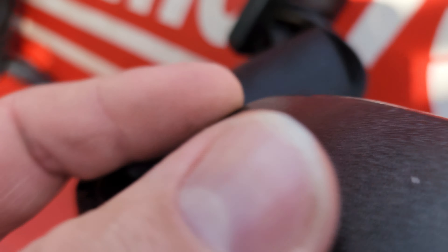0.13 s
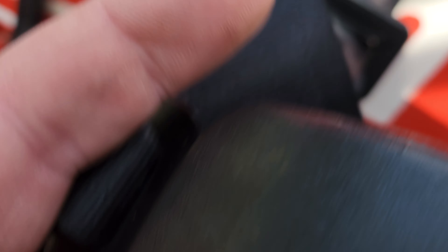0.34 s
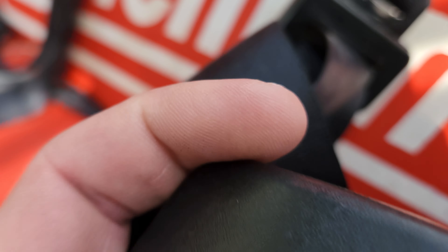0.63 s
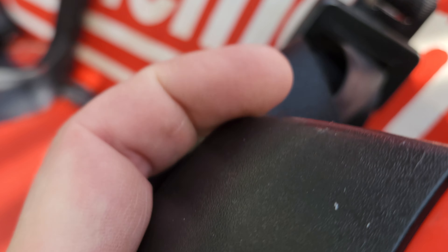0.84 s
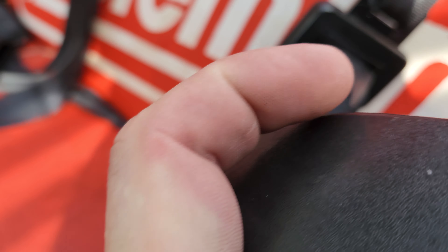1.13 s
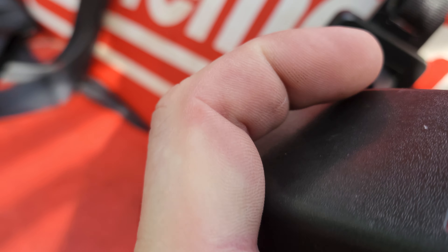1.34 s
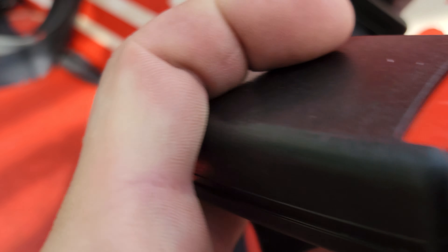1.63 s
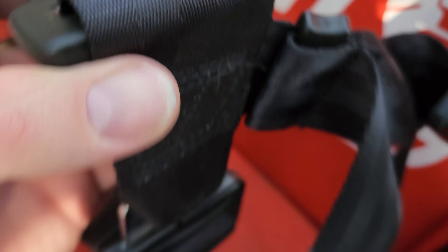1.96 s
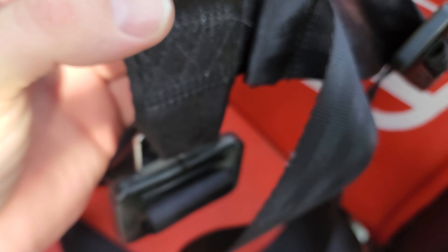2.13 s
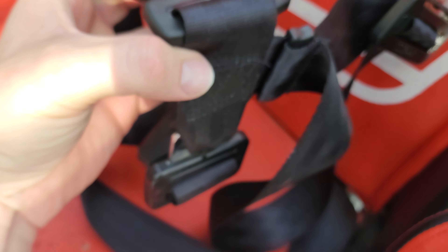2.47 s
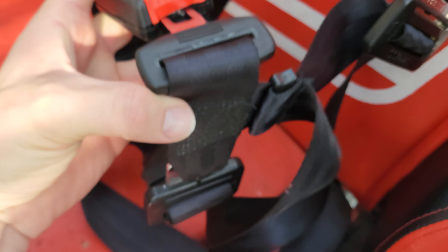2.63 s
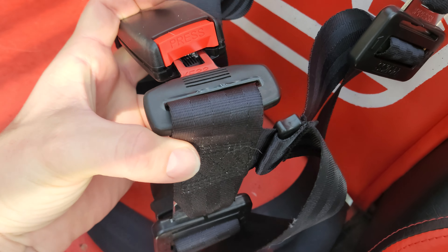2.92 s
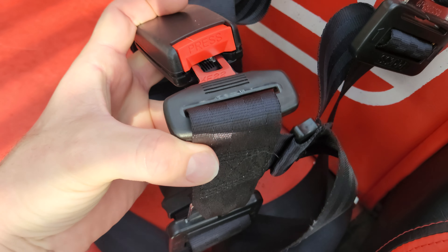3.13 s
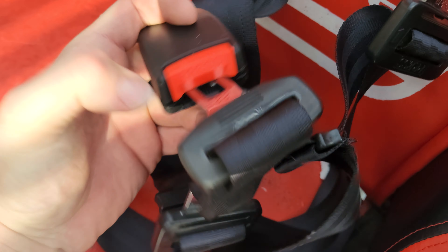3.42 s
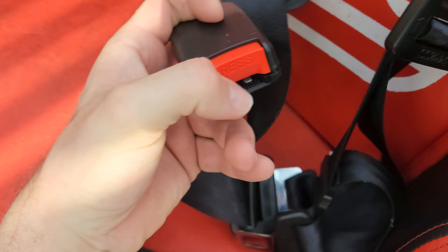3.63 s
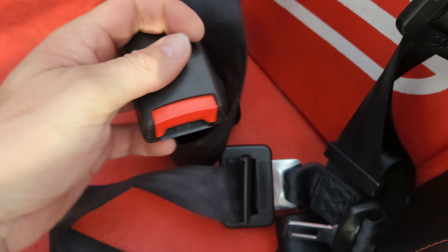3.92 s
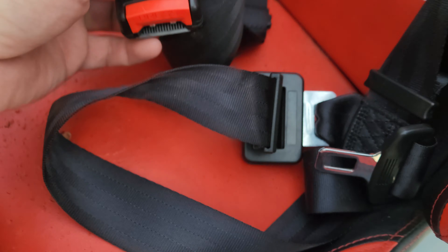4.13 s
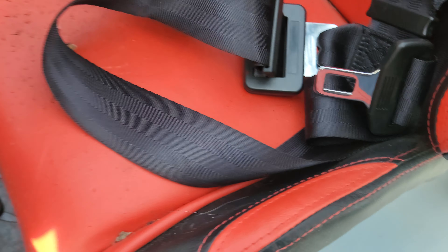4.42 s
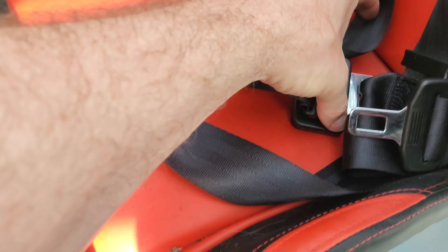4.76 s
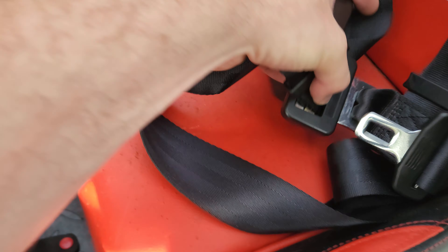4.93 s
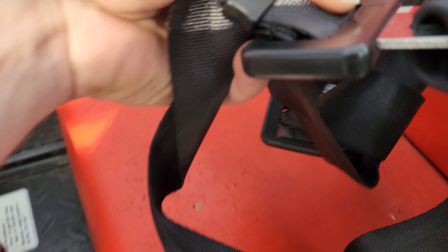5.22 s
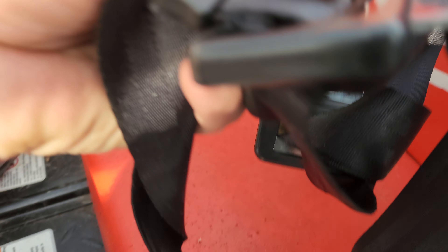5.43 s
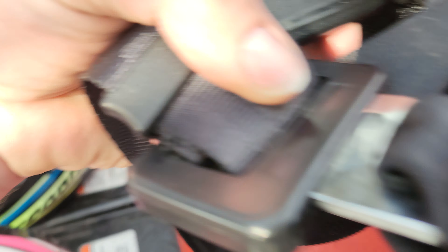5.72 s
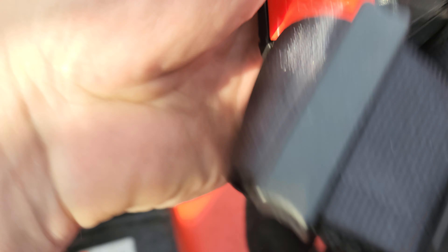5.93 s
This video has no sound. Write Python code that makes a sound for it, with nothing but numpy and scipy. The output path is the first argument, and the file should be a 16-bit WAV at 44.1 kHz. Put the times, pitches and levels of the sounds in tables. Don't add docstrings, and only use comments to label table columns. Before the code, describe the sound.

Very close to a phone outdoors, a hand turns a hollow plastic seat belt buckle with small knocks, dull thuds and skin scuffs. A sharp double knock comes early, then a quiet stretch of faint rubbing. The latch releases with light metallic clicks, and later a far louder plastic and metal clatter bursts out, followed by small handling taps. Low traffic rumble stays far behind.

```python
import sys
import numpy as np
from scipy import signal
from scipy.fft import rfft, irfft
from scipy.io import wavfile
from scipy.ndimage import uniform_filter1d

SR = 44100
rng = np.random.default_rng(int(sys.argv[2]) if len(sys.argv) > 2 else 0)


def inscribe(sig):
    pcm = np.round(np.clip(np.atleast_2d(sig).T, -1, 1) * 32767)
    wavfile.write(sys.argv[1], SR, pcm.astype(np.int16))


def makeup_ratio(level_db):
    decades = np.asarray(level_db, float) / 20
    return 10 ** decades


N = 268436


def evened(x):
    return x / np.sqrt(np.mean(x ** 2) + 1e-20)


def read(points, hz):
    f, value = np.transpose(points)
    return np.interp(np.log(hz + 1), np.log(f + 1), value)


def add(mix, s, db, pan_db, sound):
    part = mix[:, round(s * SR):][:, :sound.shape[1]]
    side_db = np.array([[0.5], [-0.5]]) * np.clip(pan_db, -14, 14)
    placed = sound / abs(sound).max() * makeup_ratio(db + side_db)
    part += placed[:, :part.shape[1]]


def band(x, lo_hz, hi_hz):
    edges_hz = [lo_hz, min(hi_hz, SR / 2.1)]
    return signal.sosfilt(signal.butter(3, edges_hz, "bandpass", fs=SR, output="sos"), x)


def noise(spectrum, same, patchy_db, size=512):
    frames = N // (size // 4) + 5
    hz = np.fft.rfftfreq(size, 1 / SR)
    a, b, c, d, patches = rng.standard_normal((frames, len(hz), 5)).T
    patches = uniform_filter1d(patches, size=6, axis=0)
    patches = evened(uniform_filter1d(patches, size=12, axis=1))
    same = np.clip(same(hz), -1, 1)[:, None]
    left = a + 1j * b
    right = same * left + np.sqrt(1 - same ** 2) * (c + 1j * d)
    z = np.array([left, right]) * makeup_ratio(read(spectrum, hz)[:, None] + patchy_db * patches)
    return evened(signal.istft(z, nperseg=size, noverlap=size * 3 // 4)[1][:, :N])


# (frequency [Hz], density [dB/Hz])
TRAFFIC_SPECTRUM = [(8.8, -32), (15, -33.5), (53, 7.5), (90, 0.5), (198, -7.5), (423, -24.5), (602, -21.5),
                    (1220, -24), (3390, -51.5), (7480, -61), (8410, -39.5), (9460, -79), (11600, -72),
                    (15100, -65), (16500, -69)]
# (frequency [Hz], correlation [-1..1])
TRAFFIC_LIKENESS = [(60, 0.97), (180, 0.94), (550, 0.43), (1650, -0.88), (4970, -0.36), (15000, -0.28)]
# (time [s], level [dB])
RUMBLE_SWELL = [(0, -43), (.8, -43.5), (.95, -46.5), (1.3, -45), (2.4, -43), (2.85, -47), (3.2, -41.5),
                (3.4, -48), (3.7, -42), (4.6, -41), (4.9, -44), (6.08, -44)]
# (time [s], rise [dB], reach [s])
HAND_BUMPS = [(.493, 6, .05), (1.03, 1.5, 0.058), (3.36, 6, 0.043), (3.56, 5.5, 0.11), (4.7, 3, 0.059),
              (5.26, 4.5, 0.12), (5.89, 8.5, 0.23)]


def traffic():
    haze = makeup_ratio(-43.5) * noise(TRAFFIC_SPECTRUM, lambda hz: read(TRAFFIC_LIKENESS, hz), patchy_db=1.0, size=2048)
    low = signal.sosfiltfilt(signal.butter(2, 230, fs=SR, output="sos"), haze)
    steady = low / np.sqrt(uniform_filter1d((low ** 2).mean(0), size=4000))
    t = np.arange(N) / SR
    s, db = np.transpose(RUMBLE_SWELL)
    swell_db = np.interp(t, s, db) + 3.0
    for at, rise_db, reach_s in HAND_BUMPS:
        swell_db += rise_db * np.maximum(1 - abs(t - at) / reach_s, 0)
    return haze - low + evened(steady) * makeup_ratio(swell_db)


# (time [s], hiss level [dB], lightness [dB])
CREEP = [(.05, -69.5, -5), (.12, -58, 0), (.62, -53, -2.5), (.82, -66.5, -4), (1.62, -65, 4),
         (1.85, -61.5, 0.5), (2.22, -64.5, -3.5), (2.75, -73.5, 1), (3.34, -64.5, -2.5), (3.58, -48, 2.5),
         (3.8, -60.5, 1), (4.2, -67, -1), (4.58, -61.5, 1), (4.78, -47, -2), (4.9, -56, 3.5),
         (5.62, -63, -0.5), (5.8, -52.5, 2), (6.08, -59, -0.5)]
# (time [s], length [s], hiss level [dB], body over hiss [dB], colour [Hz])
STROKES = [(0.08, 0.11, -59.5, 9, 2460), (1.002, 0.041, -49.5, -6, 2320), (1.032, 0.078, -58, 4, 2430),
           (1.107, 0.052, -54, -10, 2540), (3.038, 0.31, -68.5, -2, 3160), (1.685, 0.069, -57.5, -1, 3500),
           (2.283, 0.12, -57.5, -3, 2980), (2.88, 0.11, -58, 0, 3520), (3.362, 0.025, -56, -1, 3100),
           (3.389, 0.024, -50, 0, 3170), (3.538, 0.032, -43, 3.5, 3150), (3.675, 0.037, -49, -3, 2400),
           (3.921, 0.12, -53, 3.5, 3400), (4.161, 0.061, -59.5, 3.5, 2720), (4.312, 0.042, -62, 7.5, 3300),
           (4.625, 0.037, -46.5, 3, 2720), (4.664, 0.062, -39.5, -1, 2370), (4.705, 0.054, -44, 4.5, 3100),
           (4.876, .17, -52, 4.5, 3770), (5.953, 0.064, -51, 9, 2411)]
# (time [s], length [s], hiss level [dB], body over hiss [dB], colour [Hz])
SLIDES = [(0.371, .018, -47, -3, 7060), (0.476, 0.019, -50, -4, 6830), (0.524, 0.014, -50, -16, 8000),
          (2.917, 0.18, -55, 2.5, 8000), (3.489, 0.095, -44.5, -2, 8200), (3.581, 0.076, -47, -3, 5300),
          (3.736, 0.039, -57, 2, 7500), (5.078, 0.16, -57.5, 5, 5530), (5.482, 0.081, -62.5, -11, 6500),
          (5.864, 0.024, -47, -17, 8100)]
# (frequency [Hz], density [dB/Hz])
HISS_SPECTRUM = [(1060, -12), (1900, -4.5), (2640, -3), (3390, -0.5), (5800, -6), (7710, -2.5), (9500, -15),
                 (12400, -52.5)]
# (frequency [Hz], density [dB/Hz])
TOP_SPECTRUM = [(5290, -34.5), (9000, 2), (9470, -7), (11400, -4.5), (15200, 0.5), (16200, -22),
                (16500, -25.5)]
# (frequency [Hz], density [dB/Hz])
BODY_SPECTRUM = [(150, -47), (250, 1.5), (433, -12.5), (575, -4), (1050, -9.5), (1220, -5.5), (2600, -16.5),
                 (3600, -59)]


def rubbing():
    t = np.arange(N) / SR
    s, hiss_db, light_db = np.transpose(CREEP)
    middle_db = -59.5
    creep_db = np.interp(t, s, hiss_db) - middle_db
    light_db = np.interp(t, s, light_db)
    levels_db = [middle_db + creep_db, -67.5 + 1.2 * creep_db + light_db, -54.5 + 0.83 * creep_db - light_db]
    power = makeup_ratio(np.array(levels_db)) ** 2
    coloured = np.zeros((2, N))
    strokes = [(*row, -7.5) for row in STROKES] + [(*row, -4.5) for row in SLIDES]
    for start, length, hiss_db, weight_db, hz, top_db in strokes:
        db = np.array([hiss_db, hiss_db + top_db, hiss_db + weight_db])
        at = slice(round((start - 0.008) * SR), round((start + length + 0.0088) * SR))
        shape = signal.windows.tukey(len(t[at]), 0.7)
        power[:, at] += makeup_ratio(db + 1.0)[:, None] ** 2 * shape ** 2
        resonance = evened(band(rng.standard_normal((2, N // 8)), hz / 1.13, hz * 1.163))
        coloured[:, at] += makeup_ratio(hiss_db - 4.0) * shape * resonance[:, :len(shape)]
    hiss, top, body = np.sqrt(power)

    slips = uniform_filter1d(rng.standard_normal(N), size=300)
    slips = evened(uniform_filter1d(slips, size=150))
    grains = evened(uniform_filter1d(rng.standard_normal(N), size=25))
    rough = makeup_ratio(1.4 * slips + 1.5 * grains)

    catch_db = 6.5 * np.minimum(rng.exponential(1, N), 2)
    catches = (rng.random(N) < 170 / SR) * makeup_ratio(catch_db) * body
    shell = knock(-59, 1202, [0, 0.22, -0.59, 0.57])[:, :900]
    creak = makeup_ratio(-5.5) * signal.oaconvolve(catches[None], shell, axes=1)[:, :N]
    rough = rough * (1 + 0.22 * signal.lfilter([1], [1, -0.97], catches / body))

    hiss = makeup_ratio(2.0) * hiss * rough * noise(HISS_SPECTRUM, lambda hz: 0 * hz, patchy_db=2.5)
    hiss = hiss * makeup_ratio([[-1.2], [1.2]])
    top = makeup_ratio(4.0) * top * rough * noise(TOP_SPECTRUM, lambda hz: 0 * hz, patchy_db=1.5)
    top = top * makeup_ratio([[-4.5], [4.5]])
    body = body * makeup_ratio(0.89 * slips - 1.0) * noise(BODY_SPECTRUM, lambda hz: 0.45 + 0 * hz, patchy_db=2.5)
    return hiss + top + body + coloured * rough + creak


# (time [s], length [s], pitch [Hz], level [dB])
SQUEAKS = [(3.05, .36, 1660, -62), (3.04, .26, 3800, -68), (2.94, .09, 610, -58), (5.43, .2, 1230, -62),
           (5.44, .24, 3200, -64), (.298, .036, 1260, -46), (3.02, .28, 3150, -68), (5.9, .022, 3250, -46),
           (1.43, .6, 7600, -66), (4.158, .04, 1200, -50), (1.92, .11, 3900, -62), (3.855, .025, 1600, -54),
           (4.738, .018, 1900, -42), (.54, .1, 1250, -55), (4.68, .02, 6300, -42)]


def squeaks():
    out = np.zeros((2, N))
    for s, length, hz, db in SQUEAKS:
        spread = 1 + 0.0014 / length + hz / 2.5e5
        raw = rng.standard_normal((2, round((length + 0.1) * SR)))
        fuzz = band(raw, hz / spread, hz * spread)[:, -round(length * SR):]
        add(out, s, db + 9, 0, fuzz * signal.windows.tukey(fuzz.shape[1], 0.6))
    return out


# (time [s], length [s], low edge [Hz], high edge [Hz], level [dB])
SCRAPES = [(0.582, 0.14, 2500, 3420, -51.5), (1.688, .07, 2830, 4450, -52), (2.292, .12, 1520, 3800, -54.5),
           (4.62, 0.023, 2900, 3500, -42), (4.734, .016, 3000, 4000, -41), (1.194, 0.058, 3200, 3800, -64),
           (5.865, 0.022, 3300, 4300, -50)]


def scrapes():
    out = np.zeros((2, N))
    for s, length, lo_hz, hi_hz, db in SCRAPES:
        burst_db = 2.4 * rng.exponential(1, SR // 4) * (rng.random(SR // 4) < 0.05)
        slips = rng.standard_normal((2, SR // 4)) * makeup_ratio(burst_db)
        part = evened(band(slips, lo_hz, hi_hz))[:, -round(length * SR):]
        shape = signal.windows.tukey(part.shape[1], 0.7)
        out[:, round(s * SR):][:, :part.shape[1]] += makeup_ratio(db) * part * shape
    return out


# (time [s], peak [dB], pitch [Hz], direction [+1/-1])
SHOVES = [(.173, -27, 70, 1), (.4855, -21, 66, -1), (1.034, -27.5, 60.5, -1), (3.544, -25, 70, 1),
          (3.628, -28, 70, -1), (3.556, -28, 55, 1), (4.706, -22.5, 81.4, 1)]


def shoves():
    out = np.zeros((2, N))
    for s, db, hz, direction in SHOVES:
        turns = np.arange(round(1.3 * SR / hz)) * hz / SR
        fade = np.clip(6 * turns, 0, 1) * np.clip(4 * (turns[-1] - turns), 0, 1)
        swing = direction * np.sin(2 * np.pi * turns) * np.exp(-0.6 * turns) * fade
        add(out, s, db, 0, np.tile(swing, (2, 1)))
    return out


def seat(x):
    t = np.arange(3500) / SR
    tail = rng.standard_normal((2, len(t))) * makeup_ratio(-60 * t / 0.041) * (t > 0.0015)
    return signal.fftconvolve(x, tail / np.linalg.norm(tail[0]), axes=1)[:, :N]


# (time [s], peak [dB], pitch [Hz], left over right [dB])
THUDS = [(0.169, -30.5, 483, -16), (0.238, -26, 446, 5), (0.357, -28, 468, 5), (0.685, -33, 280, -3),
         (0.711, -37, 388, 9), (1.786, -40.5, 590, -12), (3.542, -28, 573, 1), (3.624, -41, 280, 0),
         (3.92, -34, 292, -17), (4.3444, -31, 276, -16.0), (4.425, -34.5, 276, -5), (4.701, -21, 834, 3.5),
         (4.782, -31.5, 283, 2), (5.193, -36.5, 285, 2), (5.394, -37, 329, -14), (5.672, -38.5, 650, 8),
         (5.833, -35, 364, -20.5), (5.926, -33, 704, 11), (5.989, -32.5, 690, 0)]


def thuds():
    out = np.zeros((2, N))
    t = np.arange(2500) / SR
    push = 1.12 * np.sin(2 * np.pi * 130 * t) * np.exp(-t / 0.0036)
    for s, db, hz, pan_db in THUDS:
        turns = hz * (t + 0.00074 * (1 - np.exp(-t / 0.00028)))
        blow = np.sin(2 * np.pi * turns) * np.exp(-t / 0.0023) + push
        add(out, s, db + 5.0, pan_db, np.tile(-blow * (1 - np.exp(-t / 0.00063)), (2, 1)))
    return out


# (time [s], peak [dB], left over right [dB], upper edge [Hz])
SNAPS = [(.1052, -45, -5, 3500), (.2174, -46, 2, 3500), (0.238, -29.5, -2, 4220), (0.2902, -37, -2, 3600),
         (0.3556, -33, 0, 3800), (.477, -30.5, 7, 2800), (.686, -33, -5, 2500), (.694, -33, -8, 2400),
         (.714, -38, 0, 2200), (.835, -38.5, -8, 3360), (1.791, -29, -1.5, 3360), (3.542, -29, 0, 2600),
         (3.6756, -34.5, 3, 3800), (3.69, -35, 2, 3300), (3.832, -33.5, 5, 3400), (4.346, -39, -16, 2350),
         (5.196, -36.5, 2, 3400), (5.396, -32.5, -5, 3360), (5.674, -34.5, -4, 3360), (5.925, -39, 0, 4500),
         (5.966, -38, -2, 3000), (5.9905, -29.5, -1, 3600), (1.812, -46, 0, 4500), (1.905, -46, 0, 2600),
         (5.212, -43, 0, 3000), (5.244, -44, 0, 3500), (3.975, -40, 0, 1500), (3.558, -30, 0, 2300)]


def snaps():
    out = np.zeros((2, N))
    t = np.arange(800) / SR
    for s, db, pan_db, edge_hz in SNAPS:
        push = (t == 0) + 0.39 * rng.standard_normal((2, len(t))) * np.exp(-t / 0.002)
        add(out, s, db + 3.0, pan_db, band(band(push, 470, edge_hz), 300, edge_hz * 1.04))
    return out


def tick(top_db, hz, ring, ring_s):
    t = np.arange(1500) / SR
    hiss = rng.standard_normal((3, len(t)))
    decay = np.exp(-t / 0.00087) + 0.06 * np.exp(-t / 0.011)
    crack = (0.29 * hiss[:1] + hiss[1:]) * decay * (1 - np.exp(-t / 0.0008))
    low = band(crack, 1370, 10100)
    top = band(crack, 8600, 18500) * makeup_ratio([[-3], [3]])
    tone = np.sin(2 * np.pi * hz * t + np.array([[0], [1.6]]))
    tone = tone * np.exp(-t / ring_s) * (1 - np.exp(-t / 0.00022))
    ring = np.clip(ring, 0, 1)
    return (1 - ring) * low / abs(low).max() + ring * tone + makeup_ratio(top_db) * top / abs(top).max()


# (time [s], peak [dB], top octave over peak [dB], left over right [dB])
EDGE_TICKS = [(.051, -46.5, -15, -2), (0.0776, -34.5, -2, -2), (.3554, -44, -11, 4), (0.4785, -33.5, 4, 13),
              (1.4226, -23, -12, -5.5), (2.773, -52, -1, -2), (3.08, -47, 5, -3), (3.217, -53, 4, 0),
              (3.5465, -22, -1, -2), (3.5616, -32, -10, 6), (3.726, -37.5, -20, 0), (3.922, -33, -9, -11.5),
              (4.161, -52, 0, -3), (4.428, -49, -12, 0), (5.542, -43, -1, 3), (5.834, -34, -3, -11),
              (5.9903, -36, -20, 2), (2.808, -52, 0, -5.5), (2.8661, -50, 2, -3)]
# (time [s], peak [dB], top octave over peak [dB], ring [Hz], left over right [dB])
LATCH_PINGS = [(1.3987, -49, 0, 2800, -7), (2.0124, -32, 14, 7200, 1), (3.4, -32, 2, 3250, 2),
               (3.416, -34, -22, 3210, 3), (3.6268, -31, -21, 5260, -11), (3.676, -36, -16, 3300, -.5),
               (4.842, -36.5, -19, 3300, -1), (4.996, -28, -26, 3560, -5), (5.0458, -29.5, -1, 8140, -3)]
# (time [s], peak [dB], top octave over peak [dB], ring [Hz], left over right [dB])
LANDING = [(4.6506, -12, -11.5, 2260, -10), (4.6526, -17, -8, 3080, -3), (4.655, -15, -19, 7600, -1),
           (4.703, -13, 0, 3240, -3), (4.7025, -5.5, -1.5, 7970, 3.5), (4.704, -8.5, 1, 4390, -2.5),
           (4.7053, -14, 8, 7540, 7.5)]
# (time [s], peak [dB], top octave over peak [dB], edge colour [Hz], left over right [dB])
CLACKS = [(.17, -35.5, -7, 7600, -10), (.1706, -37, -25, 3400, -7), (.432, -43, -15, 8000, 10),
          (0.465, -48, -20, 3770, 5), (.529, -41, -10, 5200, 2), (1.231, -43, -25, 3200, -8),
          (1.241, -52, -6, 7000, 0), (4.346, -29.5, -12, 7530, -19), (4.3446, -33, -27, 3200, -13),
          (3.736, -45, -8, 6500, -1), (3.399, -35, -8, 8000, 0), (3.676, -37, -20, 5330, 0),
          (2.832, -59, -2, 7000, -4), (2.894, -53, 4, 8000, -6), (2.905, -56, 4, 8000, -6),
          (2.9614, -42, 2, 7900, -6), (3.101, -57, 7, 8000, -6), (3.1365, -62, 5, 8000, -4),
          (3.23, -58, 2, 8200, -4), (3.29, -62, 6, 8000, -4), (2.383, -48, -25, 3100, 0),
          (3.945, -42, -25, 3300, 0), (5.112, -46, -10, 8000, 0), (5.178, -47, -25, 5500, 0),
          (3.566, -36, -15, 6800, 0)]


def ticks():
    out = np.zeros((2, N))
    hits = [(s, db, top_db, 2710, pan_db, 0.13, 0.0024) for s, db, top_db, pan_db in EDGE_TICKS]
    hits += [(*row, 0.39 - 0.1 * row[2], 0.0024) for row in LATCH_PINGS]
    hits += [(*row, 0.38, 0.0025) for row in LANDING]
    hits += [(*row, 0.57, 0.0012) for row in CLACKS]
    for s, db, top_db, hz, pan_db, ring, ring_s in hits:
        add(out, s, db + 7.0, pan_db, tick(top_db, hz, ring, ring_s))
    return out


# (pitch ratio, level [dB], t60 [s])
SHELL_MODES = [(1, -0.5, 0.013), (1.23, -7, 0.014), (1.65, -16.5, 0.0085), (2.27, -25.5, 0.022)]


def knock(db, hz, chance):
    t = np.arange(3000) / SR
    modes = np.zeros((2, len(t)))
    for k, (ratio, mode_db, t60) in enumerate(SHELL_MODES):
        phase = np.array([[0], [k * 1.6 * chance[k]]])
        pitch_hz = hz * ratio * (1 + 0.015 * chance[k] * (k > 0))
        t60_s = t60 * (1 + 2.24 * makeup_ratio(db))
        modes += makeup_ratio(mode_db - 60 * t / t60_s) * np.sin(2 * np.pi * pitch_hz * t + phase)
    return modes * (1 - np.exp(-t / 0.0011))


# (time [s], peak [dB], shell
# pitch [Hz], left over right [dB])
SHELL_KNOCKS = [(0.0773, -28.5, 1190, 10.5), (0.151, -38, 1270, -2), (0.161, -37, 1220, 7),
                (0.177, -37, 1310, 0), (.219, -45, 1350, 2), (.254, -41, 1400, 0),
                (0.2752, -36.5, 1290, 8), (0.355, -33, 1280, 8), (0.4324, -33.5, 1200, 7),
                (0.4778, -22, 1275, 7), (0.484, -33, 1290, 5), (0.528, -36, 1250, 7),
                (.642, -37, 1400, 3), (1.215, -45, 1200, 0), (0.6837, -35, 1290, 1),
                (0.801, -34, 1235, -2), (0.908, -36.5, 1240, 5), (1.0279, -19.5, 1264, -4),
                (1.0328, -27, 1530, 16), (1.064, -30, 1520, 7), (1.4077, -20.5, 1280, 3),
                (1.4227, -11, 1336, 0), (1.959, -42.5, 1170, 5), (1.549, -46, 1250, 0),
                (2.9525, -32.5, 1200, 2), (3.366, -36, 1240, 5), (3.4065, -28.5, 1230, 8),
                  (3.4174, -29, 1240, -2), (3.4506, -39, 1150, 9), (3.4455, -41, 1300, 5),
                  (5.933, -39, 800, 5), (4.7665, -36, 900, 0), (3.541, -24, 1620, 0),
                  (3.556, -31, 1700, 0.0), (3.578, -35, 1250, 0), (3.399, -38, 1250, 0),
                  (3.626, -32, 1810, 11), (3.6758, -29.5, 1660, 1), (3.831, -35.5, 1585, 2),
                  (3.9847, -36, 1190, -0.5), (4.344, -38.5, 1190, -15.5), (4.6499, -2.5, 1355, 3.5),
                  (4.65433, -4, 1355, -3), (4.65876, -10.5, 1355, -5), (4.66171, -19, 1355, -3),
                  (4.688, -23, 1280, -5), (4.673, -22, 1500, -1), (4.6833, -19.5, 1264, -10),
                  (4.7048, -13, 1480, 3), (4.841, -33, 1320, -3), (4.9776, -34, 1260, 6),
                  (5.854, -38, 1430, -2), (5.8692, -36, 1310, -2), (5.8758, -30.5, 1225, -5),
                  (5.8792, -32.5, 1225, -7), (5.899, -30.5, 1570, 2), (5.945, -33.5, 1180, -3),
                  (5.989, -39, 1490, -9), (3.008, -40, 1250, 0), (3.081, -42, 1230, 0),
                  (3.879, -42, 1600, 0), (3.959, -42, 1300, 0), (5.131, -42, 850, 0), (4.937, -42, 1100, 0)]


def knocks():
    out = np.zeros((2, N))
    for s, db, hz, pan_db in SHELL_KNOCKS:
        add(out, s, db, pan_db, knock(db, hz, rng.standard_normal(4)))
    return out


def scene():
    background = traffic() + rubbing() + squeaks() + scrapes() + shoves()
    hits = thuds() + snaps() + ticks() + knocks()
    return background + hits + makeup_ratio(-15) * seat(hits)


def roll_off(x):
    return signal.sosfilt(signal.butter(12, 16680, fs=SR, output="sos"), x)


# (frequency [Hz], gain [dB])
PORT_NOTCH = [(100, -2), (8400, 0.5), (9000, -12), (9600, -15), (10100, -9), (10600, -0.5)]


def record(dry):
    port_gain = makeup_ratio(read(PORT_NOTCH, np.fft.rfftfreq(N, 1 / SR)))
    clipped = np.clip(irfft(rfft(dry) * port_gain, N), -1, 1)
    edge = signal.firwin(301, 16200, window=("kaiser", 8), fs=SR)
    mix = signal.oaconvolve(clipped, edge[None], "same")
    return roll_off(mix)


dry = scene()
out = record(dry)
inscribe(out)
```